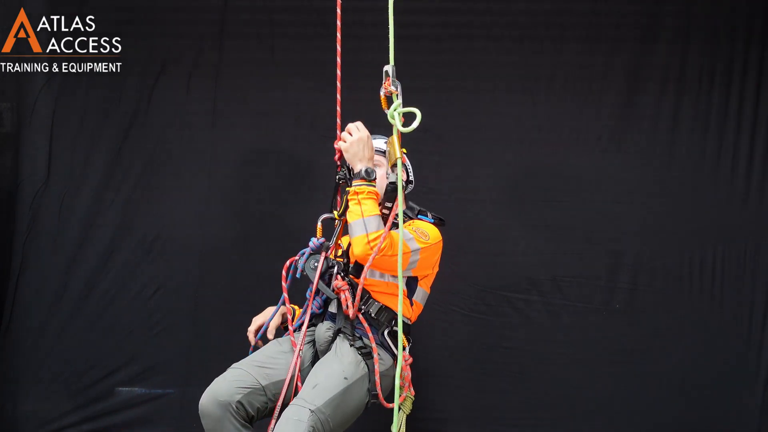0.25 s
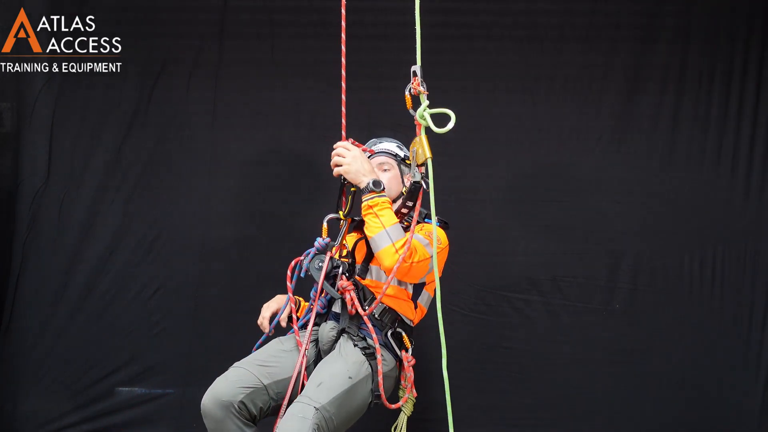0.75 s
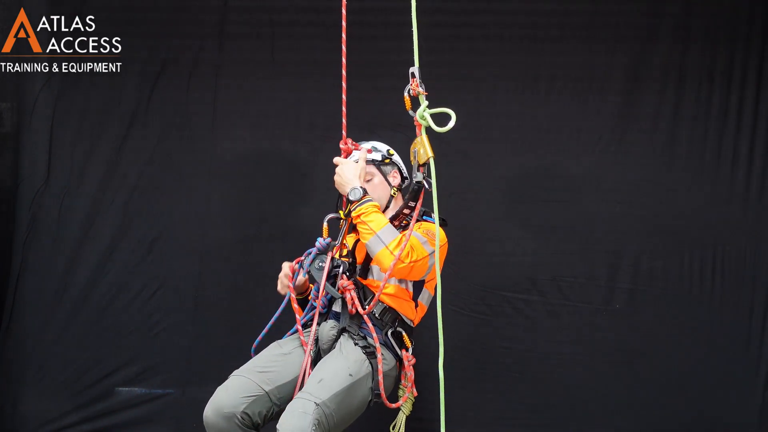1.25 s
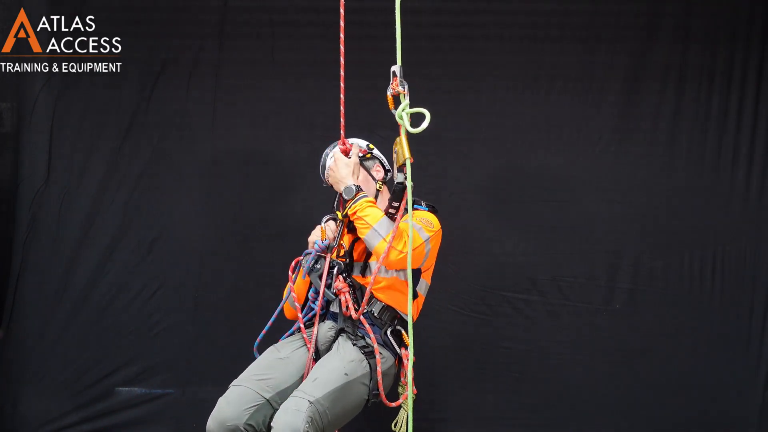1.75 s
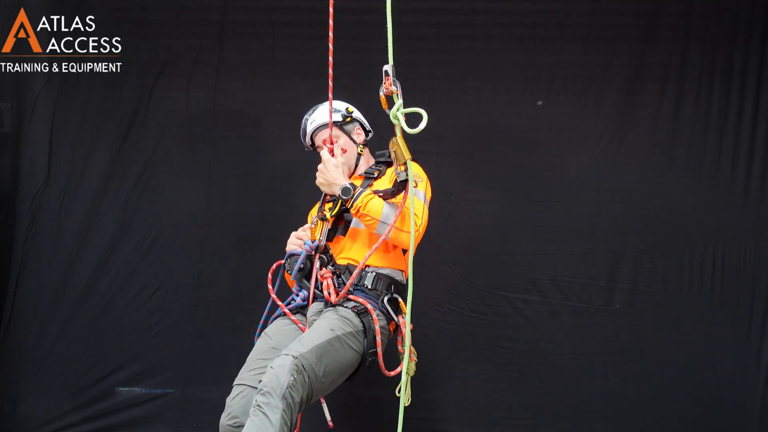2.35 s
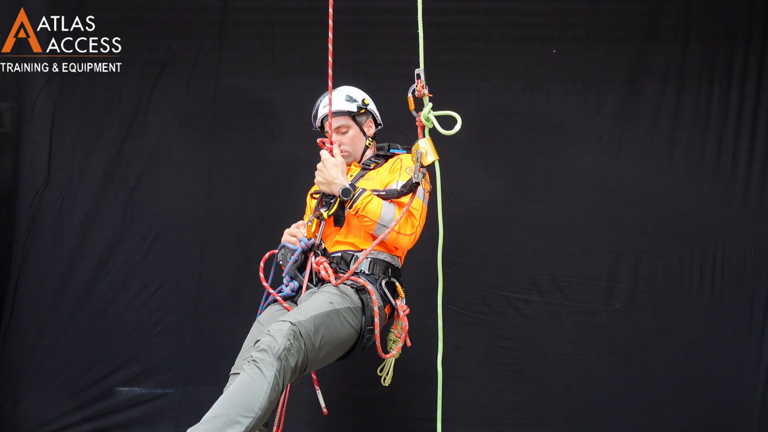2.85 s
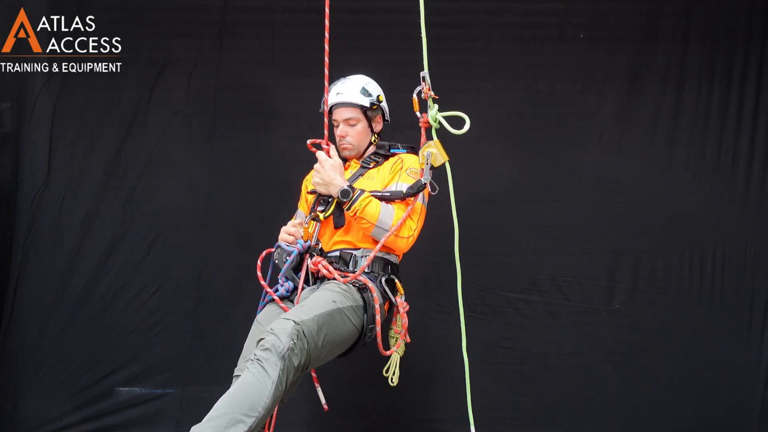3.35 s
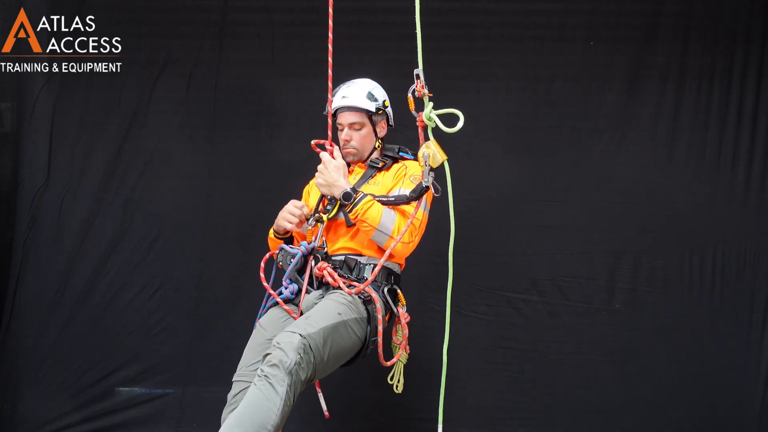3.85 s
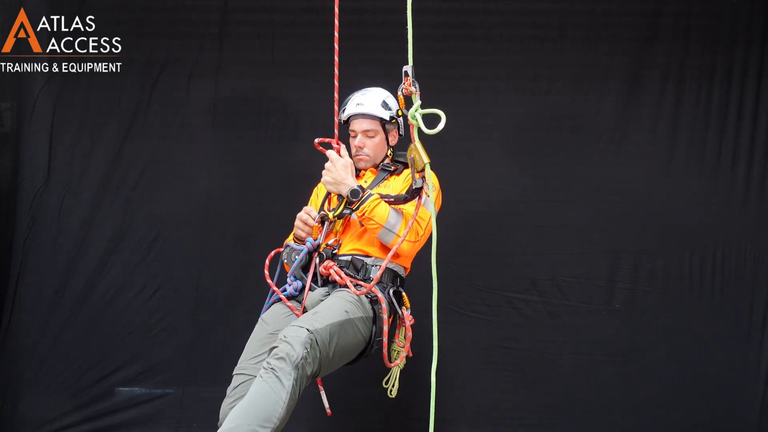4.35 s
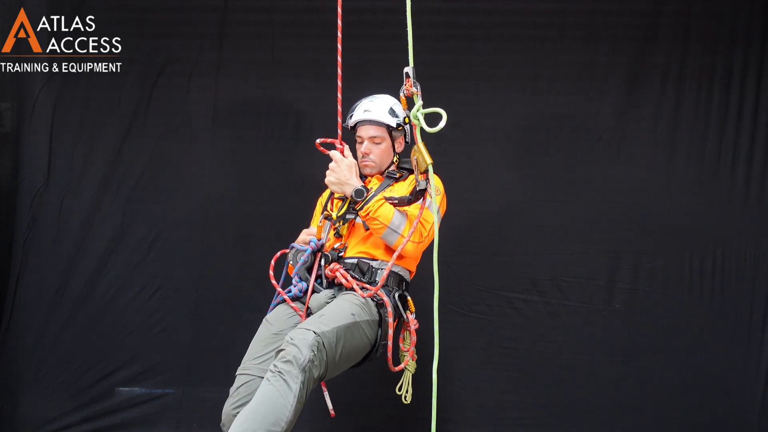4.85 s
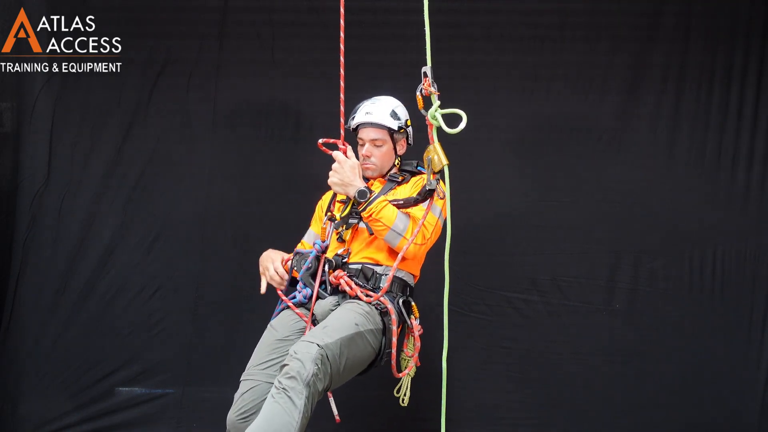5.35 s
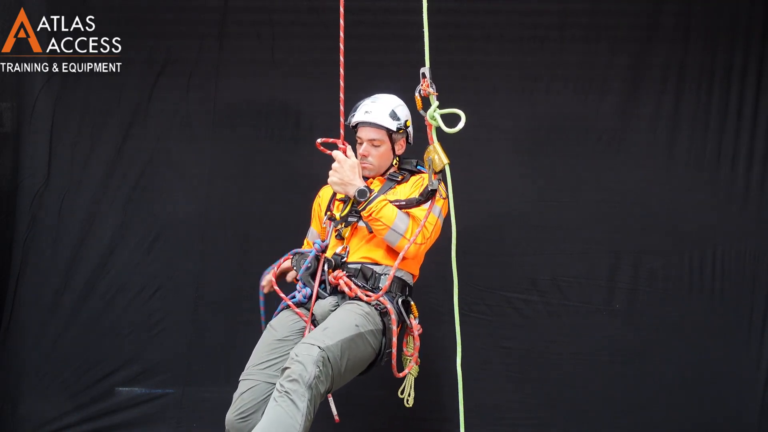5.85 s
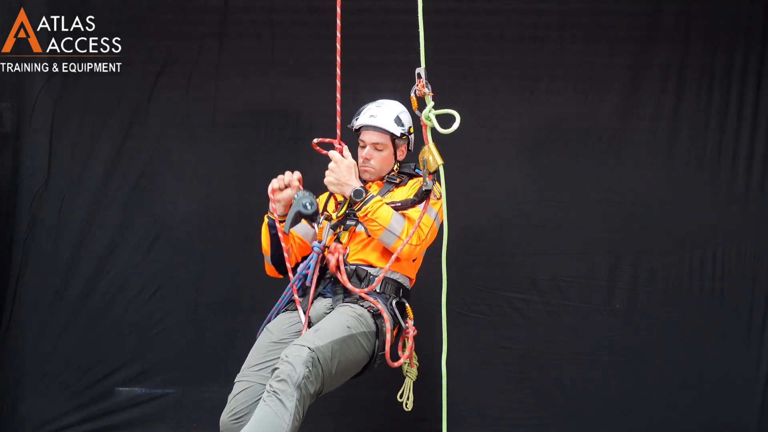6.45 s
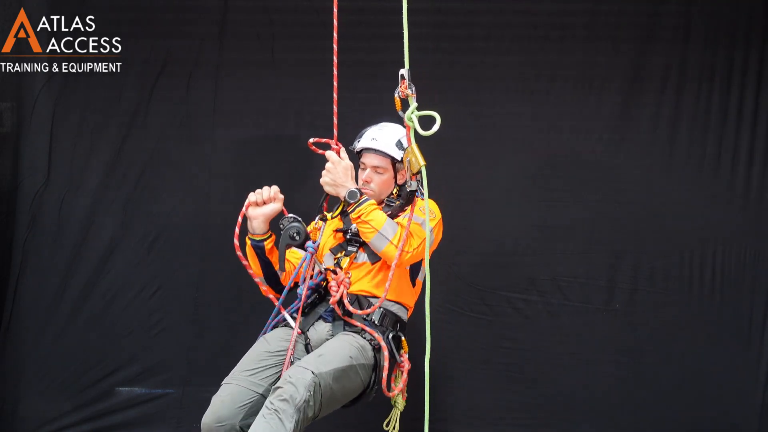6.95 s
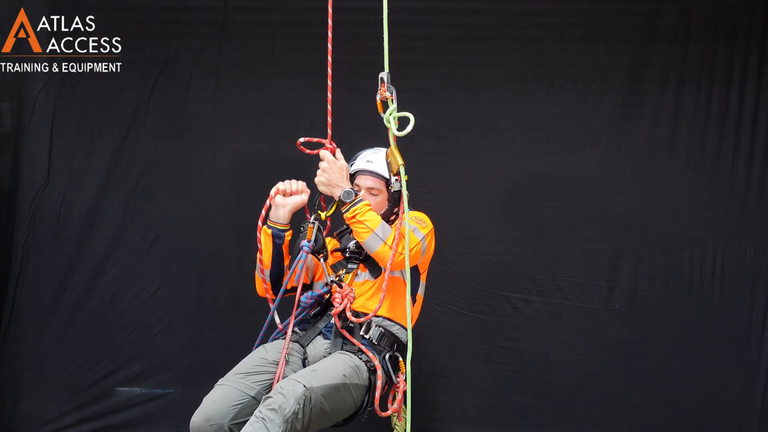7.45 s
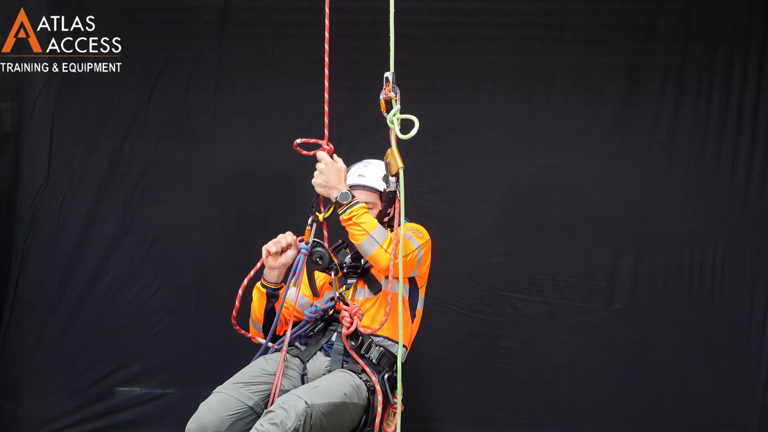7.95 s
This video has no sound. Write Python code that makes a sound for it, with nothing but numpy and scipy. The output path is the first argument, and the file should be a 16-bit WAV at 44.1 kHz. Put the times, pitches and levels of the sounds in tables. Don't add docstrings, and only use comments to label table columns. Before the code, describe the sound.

Rope and sleeve rub softly over a low, slightly wavering fan hum. Small metal ticks grow into crisp connector snaps, peaking in a loud, bright clank with a long echoing tail. A near pause follows, then a shaken burst of rattling hardware and scattered clinks to the end. Knocks are short, dry and close to the microphone, answered by a large, bright hall.

```python
import sys
import numpy as np
from scipy import signal
from scipy.io import wavfile

SR = 44100
rng = np.random.default_rng(int(sys.argv[2]) if len(sys.argv) > 2 else 0)


def persist_wave(psi):
    counts = np.round(np.clip(psi, -1, 1) * 32767).astype(np.int16)
    wavfile.write(sys.argv[1], SR, np.atleast_2d(counts).T)


def makeup_ratio(level_db):
    decades = np.asarray(level_db, float) / 20
    return 10 ** decades


N = 360914


def in_time(rows):
    s, *columns = np.transpose(rows)
    return [np.interp(np.arange(N) / SR, s, c) for c in columns]


def at_hz(points, hz):
    table_hz, level = np.array(points)[:, 0], np.array(points)[:, 1]
    return np.interp(np.log(hz), np.log(table_hz), level)


def rms_one(x):
    return x / np.sqrt(np.mean(x ** 2) + 1e-20)


def peak_one(x):
    return x / np.max(np.abs(x), axis=-1, keepdims=True)


def band(x, low_hz, high_hz):
    sos = signal.butter(2, [low_hz, min(high_hz, .45 * SR)], "band", fs=SR, output="sos")
    return signal.sosfilt(sos, x)


def drift(rate):
    r = np.exp(-80 * np.pi * rate / SR)
    slow = signal.lfilter([1], [1, -2 * r, r * r], rng.standard_normal(N // 40 + 2002))[2000:]
    return np.interp(np.arange(N) / 40, np.arange(len(slow)), rms_one(slow))


def add(track, s, sound):
    at = round(s * SR)
    track[at:at + len(sound)] += sound[:N - at]


def knocks(contact_s, ring_s, ring_share):
    # t/s, peak level/dB, main ring f/Hz, second ring f/Hz, hall share level/dB
    clear_cracks = [(2.2994, -26, 1770.0, 5680.0, -2), (2.601, -17, 3520, 11000, -10),
                    (3.1971, -31, 3270, 6980.0, -5), (3.3313, -18, 5170.0, 2070.0, -15),
                    (3.3483, -14, 1800, 6500.0, -15.0), (3.5268, -1, 8730, 5660, -11),
                    (3.5438, -2.5, 6760, 5330, -2.5), (4.2448, -19.5, 3400.0, 9950.0, 2.5),
                    (4.6436, -28.5, 6590.0, 8760.0, -10), (4.727, -10, 8250, 1960, -6.5),
                    (4.8458, 0.5, 3200, 5150, -8), (4.8528, 9.5, 5800, 9260.0, 6), (6.1505, -4, 8960, 2700, -7),
                    (6.1856, -16, 1640.0, 3170.0, -7), (6.3339, 0.5, 7550, 4070, -2.5),
                    (6.4155, -6.5, 2930, 9000, -3), (7.2716, -17, 3700, 5400, -3.5),
                    (7.8331, -9.5, 8610, 5000.0, -9),
                    (4.8465, -2, 2080, 12300, -2),
        (4.8535, -5, 4600, 8100, 4),
        (6.3712, -1, 3700, 14100, -3.5),
        (7.849, -4.5, 7970, 2720, -25),
    ]
    clinks = [(1.63, -35.5, 1790.0, 7340.0, 3.5), (2.0642, -23, 3220, 4670.0, -6),
              (2.2386, -12, 4130, 8600, -5.5), (2.4393, -5.5, 2900, 4700, -8),
              (2.9593, -15, 2950.0, 5240, -19), (3.2166, -19, 3380, 2050.0, -1.5),
              (3.5118, -16, 3640.0, 1700.0, 0.5), (4.2795, -25, 3420.0, 9820.0, -14),
              (5.6444, -36, 1590.0, 5340.0, 2.0), (6.2796, -4.5, 4560, 2520, -2),
              (6.6564, -14, 1500, 5100.0, -7), (6.7357, -18, 5240, 2200, 0),
              (6.7684, -13.5, 5560, 3500, -3), (7.3878, -16, 1530, 4100, -4),
              (7.5802, -21, 3620.0, 5380.0, -5), (7.7401, -5.5, 5230, 8400.0, -5.5),
              (7.764, -18, 4800, 1700.0, -1), (7.8465, -3, 2870, 3500, 3.5)]
    flat_knocks = [(0.4467, -22.5, 4670, 6290.0, -4), (1.3438, -23.5, 2680, 3850.0, -7),
                   (1.746, -34.5, 2780, 3920, 2.5), (2.167, -26, 3490.0, 2050.0, -10.0),
                   (2.3501, -15, 2670, 3940.0, -15), (2.394, -19.5, 2840, 4430, -12.0),
                   (3.4566, -19.5, 2130.0, 3320, -8.0), (3.714, -16.5, 3000, 4800, -7),
                   (3.89, -23, 5160, 3320.0, -1), (3.9148, -8, 3350, 2090.0, -6.5),
                   (4.0118, -26, 2540, 7100, -11), (4.154, -28.5, 3500, 5250.0, 3),
                   (4.2192, -22, 3380.0, 5620.0, -8), (4.839, -21, 6120.0, 3450.0, -5),
                   (5.7785, -30, 2820, 5400, -3.5), (6.111, -24, 5750, 3600.0, -8),
                   (6.2714, -16, 2540, 4700, 2.0), (6.545, -15.5, 4070, 8800, 4),
                   (6.6448, -10, 4570, 2700, -3.5), (6.8047, -15.5, 3550, 2500.0, -0.5),
                   (6.8667, -9.5, 3880.0, 3000.0, -8), (6.9257, -16.5, 3700.0, 7500, 0.5),
                   (6.93, -12.5, 3510.0, 5100, -4.0), (7.221, -23, 3120.0, 4550, -3.0),
                   (7.2516, -15, 3400.0, 5200, -6.5), (7.4743, -8, 3500, 5140, -4),
                   (7.5995, -17, 3577, 2090.0, 5), (7.6086, -11.5, 5100, 2070.0, -6),
                   (7.646, -17, 3400.0, 5300.0, -1), (7.696, -8, 3270, 2700.0, -5)]
    ticks = [
        (2.5647, -6.0, 3210, 8600, -7.5),
        (3.476, -25, 6420.0, 5120.0, -6),
        (3.49, -25.0, 2020.0, 5960.0, -8.0),
        (6.357, 1, 7640, 3870, -8),
        (6.3703, -0.5, 4880, 8260, -1),
    ]
    bite, second_ring_db = 5.2, -5.5
    hall_rough, hall_ring = 0.43, .17
    kinds = ((clear_cracks, -7), (clinks, -13.5), (flat_knocks, -22.5), (ticks, -3))
    blows = sorted((*row, crack_db) for rows, crack_db in kinds for row in rows)
    near, sent, t = np.zeros(N), np.zeros(N), np.arange(600) / SR
    roughs = rng.standard_normal((len(blows), len(t))) * np.exp(-t / contact_s)
    for (s, peak_db, hz, second_hz, hall_db, crack_db), rough in zip(blows, roughs):
        rings = np.sin(2 * np.pi * hz * t) + makeup_ratio(second_ring_db) * np.sin(2 * np.pi * second_hz * t)
        choked = ring_share * np.array([[1], [hall_ring]]) * rings * np.exp(-t / ring_s)
        contact = bite * (t == 0) * [[.55], [1]] + rough * [[1], [hall_rough]]
        body_top_hz = min(6900, 1.51 * max(hz, second_hz))
        body = peak_one(band(band(contact, 1590, 9100), 1200, body_top_hz)) + choked
        crack = peak_one(band(contact, 9070, 13100)) * makeup_ratio(crack_db)
        direct, fed = peak_one(peak_one(body) + crack)
        add(near, s, makeup_ratio(min(peak_db, 4)) * direct)
        add(sent, s, fed * np.std(direct) / np.std(fed) * makeup_ratio(peak_db + min(hall_db, 5)))
    return near, sent


def rebounds():
    # t/s, peak level/dB, centre f/Hz, decay time/s
    bounces = [(2.3543, -18, 2900, .002), (3.555, -15, 6900, .003), (3.563, -20, 10900, .003),
               (3.61, -27, 2600, .002), (6.373, -6, 3200, 0.0023), (6.3735, -8, 8300, .003),
               (6.409, -11, 3800, .0015), (6.42, -12, 2900, .002), (6.435, -13, 5200, .001),
               (6.445, -15, 4800, .001), (6.466, -17, 4500, .0015), (6.488, -17, 6000, .0015),
               (6.575, -21, 3500, .002), (7.493, -24, 5300, .003), (7.512, -19.5, 3400, .003),
               (7.528, -29, 5170, .003), (7.54, -33, 5500, .003), (7.665, -21, 3400, .003),
               (7.834, -23, 1000, 0.0037), (7.8484, -6, 3430, 0.0017)]
    out, t = np.zeros(N), np.arange(1200) / SR
    roughs = rng.standard_normal((len(bounces), len(t)))
    for (s, peak_db, hz, dies_s), rough in zip(bounces, roughs):
        contact = rough * np.exp(-t / max(dies_s, 3e-4))
        add(out, s, makeup_ratio(peak_db) * peak_one(band(contact, 0.86 * hz, 1.14 * hz)))
    return out


def ringing(modes_hz, modes, hits, sustain, clang_db):
    swing_m, swing_hz = 0.013, 7.0
    hz = np.array(modes_hz)[:, None]
    out, (level_db, t60) = np.zeros(N), np.transpose(modes)[:, :, None]
    spread = rng.standard_normal((len(hits), 3, len(modes), 1))
    spread[0, 0] = 0
    for (s, hit_db, damped_s), (uneven, detune, phase) in zip(hits, spread):
        t = np.arange(round((damped_s + .04) * SR)) / SR
        heard = t + swing_m / 343 * np.sin(2 * np.pi * swing_hz * t)
        dull_db = 0.39 * (hits[0][1] - hit_db) * np.log2(hz / 3000)
        level = makeup_ratio(hit_db + level_db - dull_db + 1.8 * uneven)
        decay = makeup_ratio(-60 * t / np.clip(sustain * t60, .03, 1.5))
        long = decay * np.sin(2 * np.pi * (hz * heard + phase))
        twin_hz = hz * (1 + .007 * detune)
        twin = makeup_ratio(clang_db - 60 * t / .07) * np.sin(2 * np.pi * (twin_hz * t - phase))
        envelope = np.clip(t / .001, 0, 1) * np.clip((damped_s + .04 - t) / .04, 0, 1) ** 2
        add(out, s, envelope * (level * (long + twin)).sum(axis=0))
    return out


def big_link():
    link_hz = [2033, 3274, 3394, 3458, 3666, 5181, 5614, 6441, 6982, 8936, 9397, 9700, 10960, 15141]
    # level/dB, T60/s
    link_modes = [(-3, 0.044), (1, 0.026), (-4.5, 0.028), (1.5, 0.024), (-14, 0.06), (-5, 0.027),
                  (-4.5, 0.03), (3, 0.041), (-5, 0.055), (-6.5, 0.045), (-5, 0.04), (-13, 0.09),
                  (-11, 0.066), (-11, 0.06)]
    partner_hz = [3190, 4880, 5047, 5533, 5670, 6000, 6680, 10820, 12400, 13490, 14340]
    # level/dB, T60/s
    partner_modes = [(-7, .03), (-16, 0.029), (1, 0.019), (-3, 0.038), (-14, 0.041), (-18, .03),
                     (-3, 0.039), (-8.5, 0.089), (-27, .08), (-13, 0.045), (-27, .06)]
    # t/s, level/dB, damped after/s
    hits = [
        (4.846, -5.0, .17),
        (4.8545, -13.0, .16),
        (4.727, -44.0, .1),
    ]
    link = ringing(link_hz, link_modes, hits, sustain=2.4, clang_db=-6.0)
    return link + ringing(partner_hz, partner_modes, hits, sustain=2.4, clang_db=-3.0)


def gate():
    gate_hz = [3345, 3755, 5430, 7490, 8260, 8610, 10040, 14120, 14620]
    # level/dB, T60/s
    gate_modes = [(16, 0.17), (7, 0.15), (-11, 0.33), (-3, .4), (-4, 0.75), (-4, .3), (3.5, 0.7), (-11, .4),
                  (-9, .45)]
    # t/s, level/dB, damped after/s
    hits = [
        (4.245, -39.0, .6),
    ]
    return ringing(gate_hz, gate_modes, hits, sustain=0.36, clang_db=-1.0)


def rope_device():
    device_hz = [3260, 3530, 5260, 5790, 6840, 8030, 8820, 9800, 10900, 13400, 14400]
    # level/dB, T60/s
    device_modes = [(-7, 0.19), (-7, .12), (-3, .05), (-6, .06), (-0.5, .18), (-3, .06), (-11, .12),
                    (-9, 0.2), (-1, 0.2), (-14, .15), (-18, .25)]
    # t/s, level/dB, damped after/s
    hits = [
        (3.525, -30.0, .2),
        (3.544, -30.0, .2),
    ]
    return ringing(device_hz, device_modes, hits, sustain=0.18, clang_db=2.5)


def cam():
    cam_hz = [3360, 3780, 5680, 6580, 7030, 8610, 9810]
    # level/dB, T60/s
    cam_modes = [(-9, 0.3), (-9, 0.42), (-1.5, 0.5), (-9, .4), (-12, .4), (-25, .7), (-16, .8)]
    # t/s, level/dB, damped after/s
    hits = [
        (3.917, -39, .4),
    ]
    return ringing(cam_hz, cam_modes, hits, sustain=0.17, clang_db=8.5)


def metal_ring():
    ring_hz = [2950, 3715, 6175, 6858, 9600, 11100, 12600, 14450, 15410]
    # level/dB, T60/s
    ring_modes = [(-4, .28), (2, 0.26), (-2, 0.67), (-6, 0.4), (-3, .23), (-6, .3), (-9, .25), (-9, .4),
                  (-14, .27)]
    # t/s, level/dB, damped after/s
    hits = [
        (2.563, -33, .4),
    ]
    return ringing(ring_hz, ring_modes, hits, sustain=0.11, clang_db=-3.0)


def glances():
    touch_s = [2.066, 2.44, 2.96, 3.349, 3.527, 3.545, 3.84, 4.846, 4.855, 6.151, 6.335, 6.372, 6.768,
               6.931, 7.388, 7.475, 7.61, 7.698, 7.848]
    # f/Hz, level/dB, T60/s
    touch_modes = [
        [(10070, -43, .1), (8260, -48, .08), (3300, -42, .1)],
        [(2940, -33, .1), (6858, -37, .12), (4550, -37, .06)],
        [(11100, -49, .13), (3220, -42, .08)],
        [(850, -30, 0.053)],
        [(10800, -30, .08), (5550, -27, .04)],
        [(5180, -28, .06), (5320, -29, .06), (5660, -29, .05), (3500, -28, .05), (6000, -32, .04),
         (6980, -26, .05)],
        [(3350, -38, .08), (8600, -50, .08)],
        [(1590, -22, .05), (4200, -29, .05), (4560, -30, .04), (11500, -37, .05), (12950, -34, .05),
         (15550, -34, .05)],
        [(5900, -23, .04), (6200, -26, .04), (5230, -24, .12)],
        [(1910, -29, .03)],
        [(7020, -17, 0.045), (7550, -25, .05), (10800, -25, .05)],
        [(7300, -22, 0.056), (14100, -36, .06), (9500, -33, .08)],
        [(5570, -44, 0.073), (7100, -44, .08), (9600, -46, .06)],
        [(3270, -36, .07), (3810, -41, 0.25), (4900, -52, .1), (8262, -41.5, .25), (10030, -48, .15)],
        [(960, -28, 0.083)],
        [(2116, -31, .08), (3330, -31, .1), (5340, -33, .07), (5860, -45, .06), (10950, -42, .07),
         (15140, -54, .04)],
        [(5250, -26, .05), (3240, -35, .07), (9700, -48, .1)],
        [(3380, -28, .06), (6980, -40, .05)],
        [(2760, -23, 0.066), (1045, -25, .06), (5000, -25, .04), (6500, -24, 0.057)],
    ]
    cluster_share, cluster_db = .011, -5.0
    out, t = np.zeros(N), np.arange(round(.4 * SR)) / SR
    for s, modes in zip(touch_s, touch_modes):
        hz, level_db, t60 = np.transpose(modes)[:, :, None]
        fall_db = 60 * t / np.clip(t60, .02, .4)
        turn = 2 * np.pi * hz * t
        pair = np.sin(turn * (1 + cluster_share)) - np.sin(turn * (1 - .7 * cluster_share))
        neighbours = makeup_ratio(cluster_db - fall_db) * pair
        add(out, s, (makeup_ratio(level_db - 1.0 - fall_db) * (np.sin(turn) + neighbours)).sum(axis=0))
    return out


def rattles(per_s, uneven_db):
    # t/s, end t/s, level/dB
    bunches = [
        (6.15, 6.37, -37.5),
        (6.372, 6.54, -20),
        (7.85, 8.04, -28.5),
        (4.86, 5.1, -28),
        (3.545, 3.68, -31.5),
        (3.348, 3.495, -33.5),
        (2, 2.24, -54),
    ]
    out = np.zeros(N)
    sizes = makeup_ratio(uneven_db * np.minimum(rng.exponential(1, N), 4)) * rng.choice([-1, 1], N)
    clicks = rms_one(band(sizes * (rng.random(N) < per_s / SR), 1230, 9500))
    for start, end, level_db in bunches:
        part = clicks[round(start * SR):round(end * SR)]
        add(out, start, makeup_ratio(level_db) * part * np.linspace(1, .12, len(part)))
    return out


def thuds(contact_s, ring_s):
    # t/s, peak level/dB, body f/Hz
    dull_knocks = [(2.195, -30, 907), (2.298, -27, 880), (2.349, -23, 1280), (3.254, -26.5, 497),
                   (3.285, -27.5, 770), (3.348, -19, 850), (3.455, -33, 837), (3.61, -31, 1330),
                   (3.664, -25.5, 894), (6.3, -25, 764.4), (4.314, -29.5, 860), (6.372, -20, 830),
                   (6.151, -21, 1120), (6.61, -30, 980), (6.654, -21.5, 1050), (7.271, -29, 950),
                   (7.3873, -14.5, 960), (7.577, -21.5, 870), (7.741, -16.5, 960), (7.848, -17, 1120)]
    out, t = np.zeros(N), np.arange(2500) / SR
    contacts = rng.standard_normal((len(dull_knocks), len(t))) * np.exp(-t / contact_s)
    for (s, peak_db, hz), contact in zip(dull_knocks, contacts):
        body = np.sin(2 * np.pi * hz * t) * np.exp(-t / ring_s)
        rough = peak_one(band(contact, 0.75 * hz, 1.49 * hz))
        add(out, s, makeup_ratio(peak_db) * peak_one(body + 0.82 * rough))
    return out


def strokes():
    # t/s, hold time/s, force level/dB, brightness level/dB
    rubs = [(0.0, 0.26, -40.5, -1.5), (0.3, 0.13, -40.5, 2.5), (0.59, 0.016, -44, 5), (1.2, 0.34, -48, 0),
            (1.9, 0.14, -43, -4), (2.06, 0.098, -39.5, 0.1), (2.24, 0.24, -35.5, -0.5),
            (2.565, 0.26, -41, -0.5), (2.955, 0.035, -40.5, 2), (3.205, 0.072, -44, 10),
            (3.355, 0.46, -38.5, -3), (3.9, 0.22, -38.5, -16), (4.255, 0.044, -52, 9),
            (4.73, 0.12, -44, -2), (4.85, 0.26, -51, 18.5), (5.26, 0.32, -46.5, -12),
            (6.153, 0.22, -30.5, -21), (6.34, 0.39, -34, 1.5), (6.8, 0.27, -43.5, 5), (7.1, 0.32, -44.5, 1),
            (7.57, 0.093, -33.5, -12), (7.79, 0.2, -32, -1)]
    rise_db_per_s, fall_db_per_s = 372, 63
    rest_db, rest_brightness_db = -51.5, -1.5
    t = np.arange(0, N + 40, 40) / SR
    s, held_s, force_db, brightness_db = np.transpose(rubs)[:, :, None]
    rise_db = -rise_db_per_s * np.maximum(s - t, 0)
    shape_db = rise_db - fall_db_per_s * np.maximum(t - s - held_s, 0)
    low_db = np.maximum((force_db + shape_db).max(axis=0), rest_db)
    bright_db = (force_db + brightness_db + shape_db).max(axis=0)
    bright_db = np.maximum(bright_db, rest_db + rest_brightness_db)
    return in_time(np.transpose([t, low_db, bright_db]))


def rustle(grains_per_s, grain_db):
    low_db, bright_db = strokes()
    together = drift(24)
    sizes = makeup_ratio(grain_db * np.minimum(rng.exponential(1, (2, N)), 5)) * rng.choice([-1, 1], (2, N))
    low, bright = sizes * (rng.random((2, N)) < grains_per_s / SR)
    low = rms_one(band(low, 650, 3540)) * makeup_ratio(low_db - 4.0 + together)
    bright = rms_one(band(bright, 2670, 8900) + 0.17 * band(bright, 6200, 16200))
    return low + bright * makeup_ratio(bright_db - 7.5 + together)


def drags():
    # t/s, length/s, centre f/Hz, level/dB
    pulls = [
        (0.278, 0.12, 4600, -41.5),
        (0.377, 0.075, 3500, -43),
        (0.38, .045, 7800, -56),
        (.575, 0.09, 5700, -45),
        (.05, 0.1, 2000, -48),
    ]
    out, hiss = np.zeros(N), rng.standard_normal(N)
    for s, length_s, hz, level_db in pulls:
        part = hiss[round(s * SR):round((s + length_s) * SR)]
        swell = np.sqrt(np.hanning(len(part)))
        add(out, s, makeup_ratio(level_db) * rms_one(band(part, 0.71 * hz, 1.33 * hz)) * swell)
    return out


def hall(x, early_db, rise_s):
    # f/Hz, T60/s
    decay_times = [(300, 0.38), (1500, 0.67), (4000, 0.87), (7000, 0.77), (11000, 0.52), (16000, 0.3)]
    # f/Hz, level/dB
    colour = [(300, -3), (1000, 1.5), (3000, 0.4), (8000, 0.5), (16000, 3)]
    hall_db, gap_s, early_s = -8, 0.00018, 0.0057
    t, edges = np.arange(round(1.2 * SR)) / SR, 250 * 2 ** np.arange(0, 6.4, 1 / 3)
    tail, white = 0, rng.standard_normal((2, len(t)))
    for k, (low, high) in enumerate(zip(edges, edges[1:])):
        hz = np.sqrt(low * high)
        echoes = band(band(white[k % 2], low, high), low, high)
        tail = tail + echoes * makeup_ratio(at_hz(colour, hz) - 60 * t / at_hz(decay_times, hz))
    tail = tail * (1 - np.exp(-np.maximum(t - gap_s, 0) / rise_s))
    tail = tail * (1 + makeup_ratio(early_db) * np.exp(-t / early_s))
    return makeup_ratio(hall_db) * signal.fftconvolve(x, tail / np.sqrt(np.sum(tail ** 2)))[:N]


def ventilation(patchy_db):
    # f/Hz, level per Hz/dB
    air_spectrum = [(15, -44), (31, -24), (48, -19), (64, -4.5), (78, -11.5), (92, -16.5), (200, -17.5),
                    (363, -25), (463, -24), (2000, -32.5), (3340, -48), (4030, -59), (6210, -60),
                    (16000, -52)]
    # t/s, level/dB
    fan_swell = [(0.0, -36.5), (0.39, -47), (0.48, -32.5), (0.82, -46), (1.12, -33.5), (1.64, -40),
                 (2.07, -30), (2.39, -39.5), (4.05, -34.5), (4.12, -40.5), (4.58, -30), (5.28, -37),
                 (5.33, -50), (5.88, -35.5), (6.45, -55), (6.54, -38.5), (8.16, -37), (8.18, -54)]
    # f/Hz, rms level/dB
    motor_tones = [(48.0, -40), (100.0, -50), (149.0, -58)]
    air_db, fan_hz = -44, 63.9
    air, white, edges = 0, rng.standard_normal((2, N)), 24 * 2 ** np.arange(0, 9.6, .5)
    for k, (low, high) in enumerate(zip(edges, edges[1:])):
        level_db = at_hz(air_spectrum, np.sqrt(low * high)) + patchy_db * drift(0.91)
        air = air + band(white[k % 2], low, high) * makeup_ratio(level_db)
    t = np.arange(N) / SR
    tones = makeup_ratio(in_time(fan_swell)[0]) * np.sin(2 * np.pi * fan_hz * t + 0.98 * drift(0.86))
    for hz, level_db in motor_tones:
        tones += makeup_ratio(level_db + 0.22 * drift(1.6)) * np.sin(2 * np.pi * hz * t + 0.12 * drift(1.1))
    return makeup_ratio(air_db) * air / np.std(band(air, 148, 16000)) + np.sqrt(2) * tones


def scene():
    near, sent = knocks(contact_s=0.0011, ring_s=0.0018, ring_share=1.0)
    dull = thuds(contact_s=.003, ring_s=0.0037)
    rings = big_link() + gate() + rope_device() + cam() + metal_ring() + glances()
    rub = rustle(grains_per_s=5000, grain_db=2.0)
    shaken = rattles(per_s=2500, uneven_db=1.2)
    struck = sent * makeup_ratio(10.5) + dull * makeup_ratio(9.0) + shaken * makeup_ratio(-1.0)
    far = hall(struck, early_db=7.5, rise_s=0.001)
    far += hall(rings * makeup_ratio(10.0), early_db=-30, rise_s=.025)
    steady = dull + shaken + rings + rub + far + ventilation(patchy_db=1.4) + rebounds() + drags()
    top_cut = signal.cheby2(12, 30, 15950, fs=SR, output="sos")
    top_share = .4
    mono = top_share * near + signal.sosfiltfilt(top_cut, steady + (1 - top_share) * near)
    return np.stack([mono, mono])


def limiter(x):
    limit_db, recovery_db_per_s = -1.0, 68.0
    over_db = np.maximum(20 * np.log10(np.abs(x) + 1e-9) - limit_db, 0)
    climb = recovery_db_per_s * np.arange(N) / SR
    held_db = np.maximum.accumulate(over_db + climb, axis=-1) - climb
    return x * makeup_ratio(-held_db)


def parting(mid):
    # t/s, length/s, level under the sound/dB
    moments = [
        (.325, 0.042, -14),
        (5.037, 0.047, -9),
        (6.2, .045, -15),
    ]
    share = np.zeros(N)
    for s, length_s, level_db in moments:
        add(share, s, makeup_ratio(level_db) * np.hanning(round(length_s * SR)))
    treble = band(band(mid, 4300, 13000), 4300, 13000)
    return share * np.roll(treble, 441) * [[1], [-1]]


def band_limit(x):
    return signal.sosfilt(signal.butter(12, 16840, fs=SR, output="sos"), x)


def record(dry):
    dry = signal.sosfilt(signal.butter(4, 36.0, "high", fs=SR, output="sos"), dry)
    hum = signal.sosfiltfilt(signal.butter(2, 90, fs=SR, output="sos"), dry)
    held = hum + limiter(dry - hum)
    held = signal.sosfilt(signal.cheby2(16, 60, 16900, fs=SR, output="sos"), held)
    return band_limit(held + parting(held[0]))


dry = scene()
out = record(dry)
persist_wave(out)
```